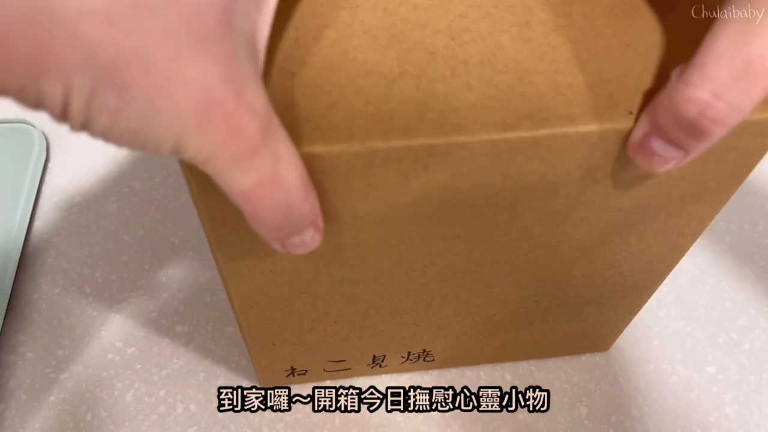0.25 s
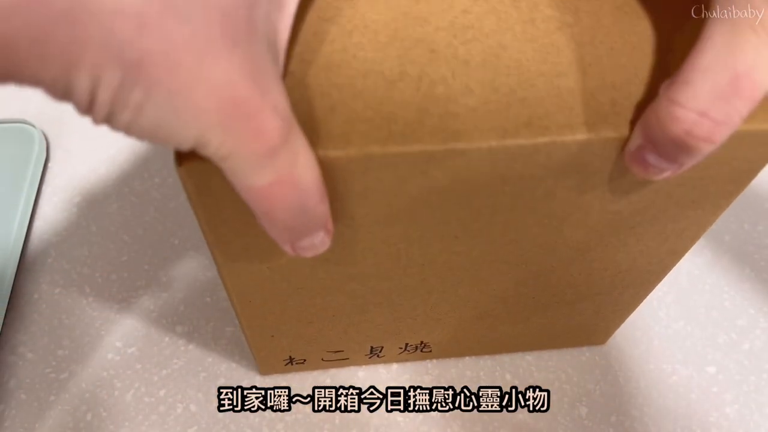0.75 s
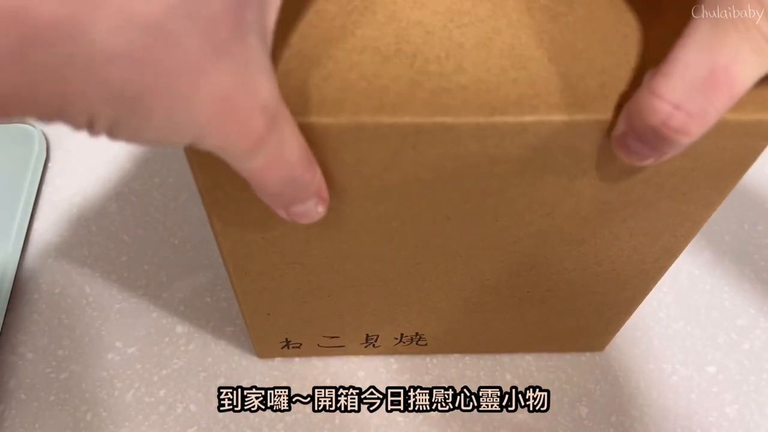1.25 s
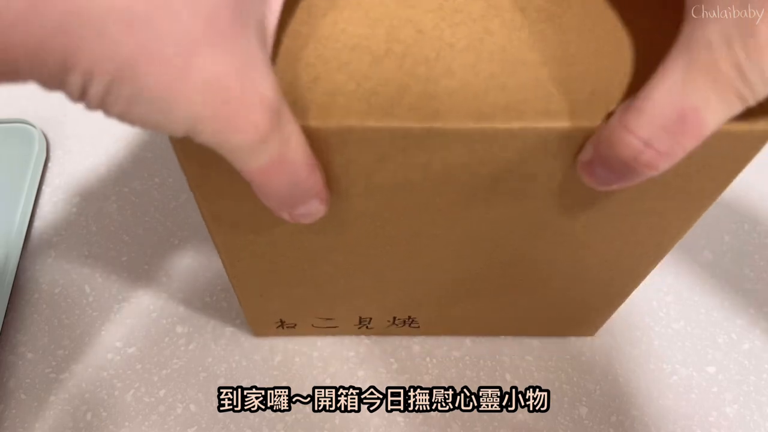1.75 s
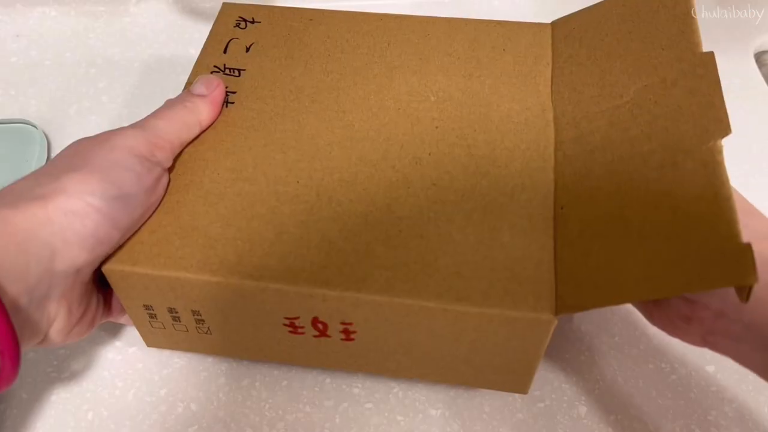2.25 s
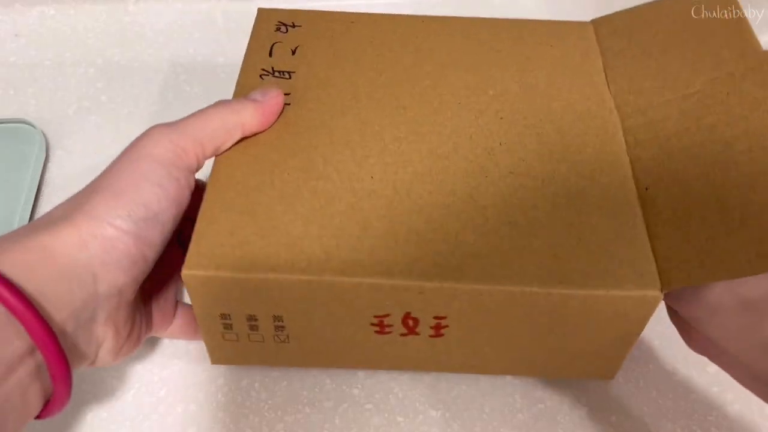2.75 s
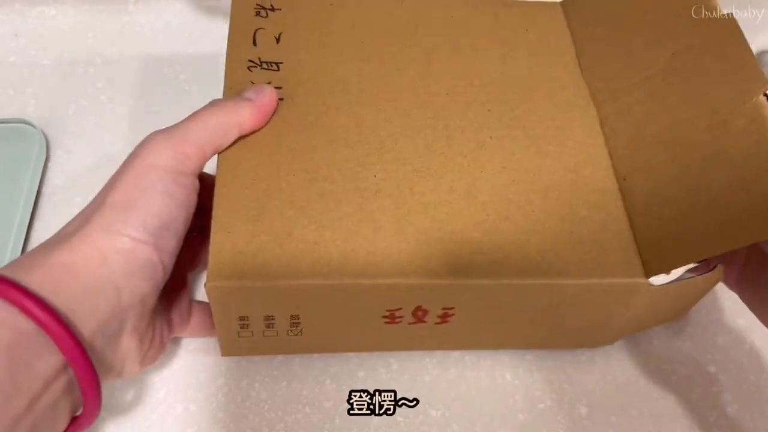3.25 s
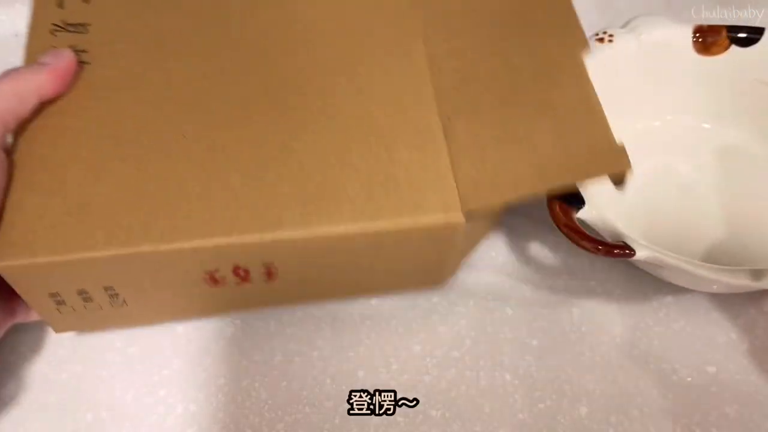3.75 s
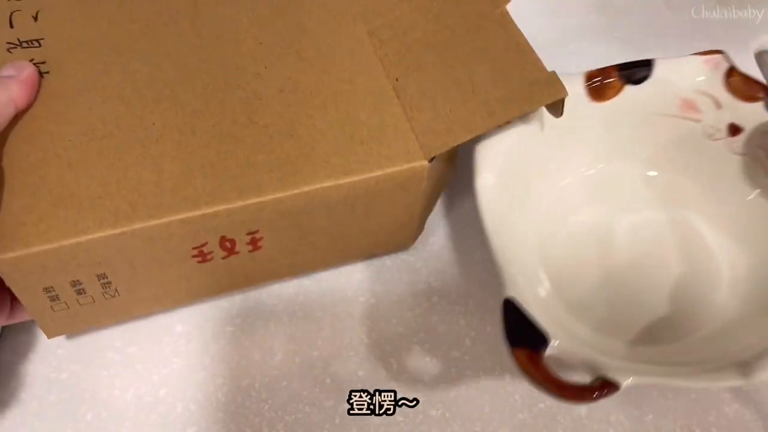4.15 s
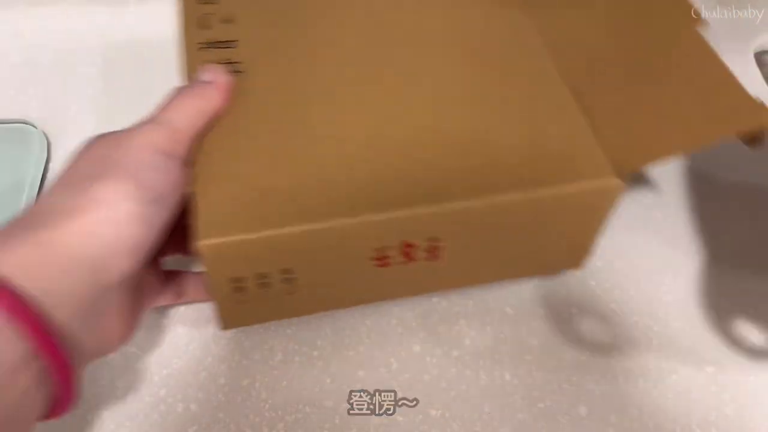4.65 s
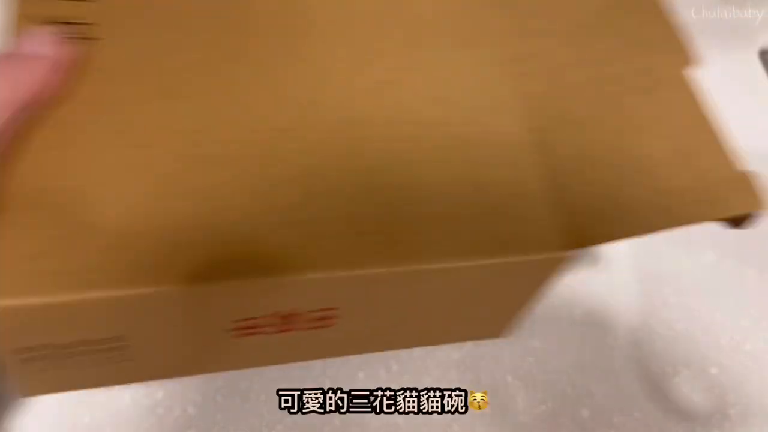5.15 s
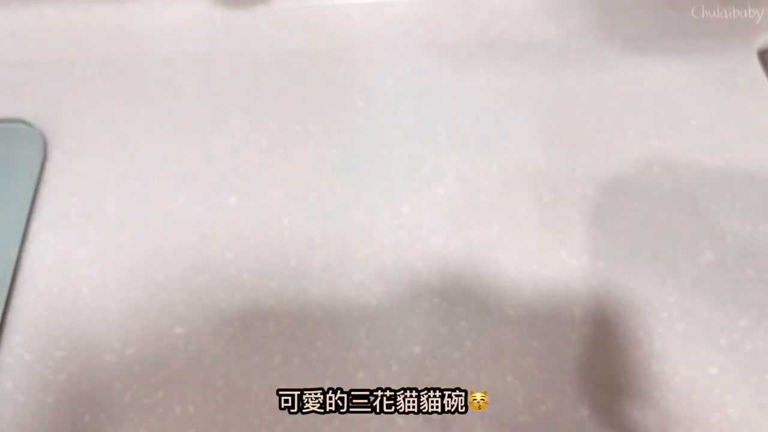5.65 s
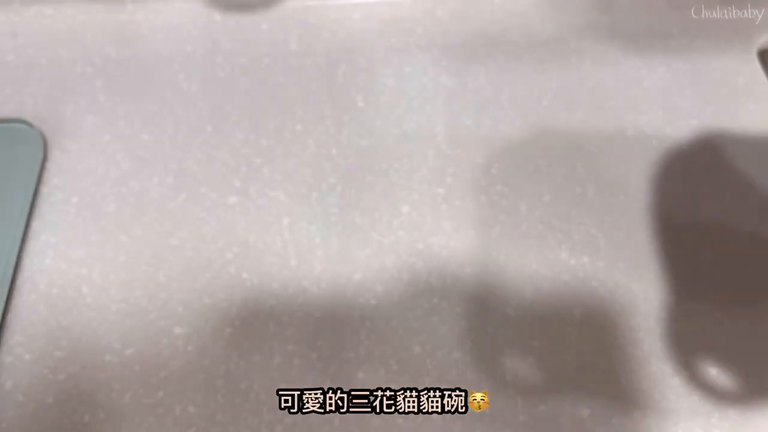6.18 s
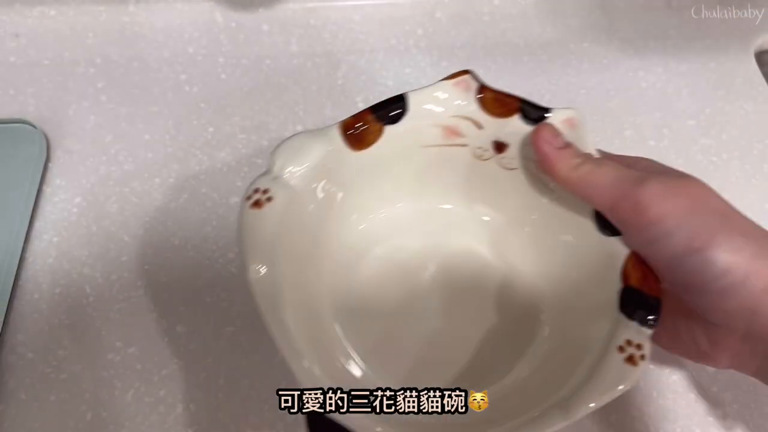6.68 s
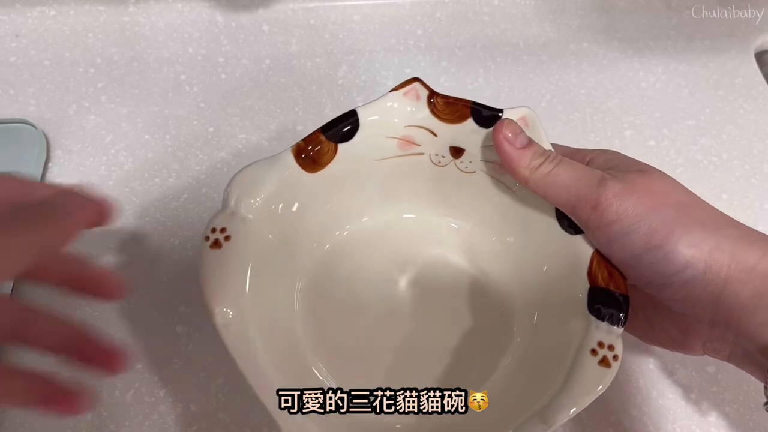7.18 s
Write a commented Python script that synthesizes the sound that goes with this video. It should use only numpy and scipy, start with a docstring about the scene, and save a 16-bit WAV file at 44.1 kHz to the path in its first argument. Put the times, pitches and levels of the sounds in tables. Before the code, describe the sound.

A cardboard box scrapes and snaps open in close hands, a ceramic bowl chatters out with small pings, then the box is pushed aside.

```python
"""Hands work a small cardboard box open, close by in a small room: stick-slip friction makes fingers and
flaps scrape, and noise bursts with a decaying sine make tabs snap. A ceramic bowl slides out, its taps
and pings summed from damped modes. Then the box is put down and pushed aside, with friction noise
in shifting resonances, and soft thumps ring the counter. Reflections and a faint low rumble add the room."""
import sys
import numpy as np
from scipy import signal
from scipy.fft import rfft, irfft
from scipy.io import wavfile

SR = 44100
rng = np.random.default_rng(int(sys.argv[2]) if len(sys.argv) > 2 else 0)


def put_to_file(sound):
    """Save the sound as 16-bit audio at rate SR, in the file named by the first command-line argument."""
    columns = np.atleast_2d(sound).T  # one column per channel
    safe = np.clip(columns, -1, 1)
    whole_steps = np.round(safe * 32767)
    wavfile.write(sys.argv[1], SR, whole_steps.astype(np.int16))


N = 327222
TIME = np.arange(N) / SR

# half-octave filter bank
EDGES = 36 * 2 ** (np.arange(19) / 2)
CENTRES = np.sqrt(EDGES[1:] * EDGES[:-1])
BANK = [signal.butter(2, pair, "band", fs=SR, output="sos") for pair in zip(EDGES, EDGES[1:])]

# centres of the zones of rumble, body and hiss (thump, body and crack in a knock): centre_hz
ZONE_CENTRES = [172, 735, 6140]


def from_db(db):
    """Decibel law: a level becomes an amplitude gain."""
    return 10 ** (np.asarray(db) / 20)


def rms_one(x):
    """Root mean square: scale a signal to effective value 1."""
    return x / np.sqrt(np.mean(x ** 2) + 1e-20)


def at_hz(points, hz):
    """Logarithmic pitch: interpolate a spectrum along log frequency."""
    points = np.array(points)
    return np.interp(np.log(hz), np.log(points[:, 0]), points[:, 1])


def zone_level(levels, hz):
    """Spectral interpolation: blend the low, middle and high level at one frequency."""
    shares = [np.interp(np.log(hz), np.log(ZONE_CENTRES), share) for share in np.eye(3)]
    return sum(level * share for level, share in zip(levels, shares))


def drift(rate):
    """Band-limited random wander: straight lines join rate random knots per second; spread 1."""
    knots = rng.standard_normal(N // 16)
    return rms_one(np.interp(TIME * rate, np.arange(len(knots)), knots))


def room_tone(apart_db):
    """Partly coherent noise: a faint low rumble, mostly alike on both sides."""
    # floor spectrum: centre_hz, level_db (per half octave)
    floor_spectrum = [(40, -84), (60, -68), (90, -74), (135, -68), (200, -80), (400, -83), (800, -88),
                      (1600, -92), (4000, -93), (8000, -95), (15000, -102)]
    shared = rng.standard_normal((2, 1, N))
    white = shared + from_db(apart_db) * rng.standard_normal((2, 2, N))
    out = np.zeros((2, N))
    for k, (hz, band) in enumerate(zip(CENTRES, BANK)):
        # neighbouring bands take separate noises
        out += from_db(at_hz(floor_spectrum, hz)) * rms_one(signal.sosfilt(band, white[k % 2]))
    return out


def room(x, early_db, early_t60_s, low_hz, alike_hz):
    """Reverberation by convolution: early reflections off counter and hands, then a dull tail."""
    tail_t60_s, tail_db, wall_cut_hz = 0.2, -11.5, 4200
    t = TIME[:SR // 2]
    dull = signal.butter(1, [low_hz, wall_cut_hz], "band", fs=SR, output="sos")
    highs = signal.butter(2, alike_hz, "high", fs=SR, output="sos")
    # both sides share the lows and hear their own highs
    alike = rng.standard_normal((2, 1, len(t)))
    apart = signal.sosfilt(highs, rng.standard_normal((2, 1, len(t))))
    echoes = signal.sosfilt(dull, alike + apart * [[1], [-1]])
    echoes *= t > .002
    early = from_db(early_db) * rms_one(echoes[0] * from_db(-60 * t / early_t60_s))
    tail = from_db(tail_db) * rms_one(echoes[1] * from_db(-60 * t / tail_t60_s))
    return signal.fftconvolve(x[None], (early + tail) / np.sqrt(len(t)), axes=1)[:, :N]


def resonance(x, hz, width_hz):
    """Damped oscillator: a two-pole filter with gain 1 on top."""
    r = np.exp(-np.pi * width_hz / SR)
    feed = np.array([1, 0, -1]) * (1 - r * r) / 2
    return signal.lfilter(feed, [1, -2 * r * np.cos(2 * np.pi * hz / SR), r * r], x + 1e-18)


def moving_resonance(x, hz, width_hz):
    """Heterodyne filtering: shift a gliding centre to zero, smooth, and shift back."""
    r = np.exp(-np.pi * width_hz / SR)
    turn = np.exp(2j * np.pi * np.cumsum(hz) / SR)
    return 2 * np.real(turn * signal.lfilter([1 - r], [1, -r], x / turn))


def through_box(x, modes):
    """Modal resonance: the direct sound plus the ringing of panels and cavity."""
    return x + sum(from_db(db) * resonance(x, hz, width_hz) for hz, width_hz, db in modes)


def damped_mode(t, hz, db, t60_s, top_hz):
    """Exponential decay: one sine fading 60 dB in t60_s, weaker above the brightness of the touch."""
    ring = from_db(db - 60 * t / t60_s) * np.sin(2 * np.pi * hz * t)
    return ring / np.hypot(1, (hz / top_hz) ** 2)


def struck(touches, modes, rise_s):
    """Modal synthesis: every touch sets all damped modes ringing."""
    out = np.zeros(N)
    for start_s, db, top_hz in touches:
        start = round(start_s * SR)
        t = TIME[:min(SR, N - start)]
        rings = sum(damped_mode(t, hz, db + mode_db, t60_s, top_hz) for hz, mode_db, t60_s in modes)
        out[start:start + len(t)] += rings * (1 - np.exp(-t / rise_s))
    return out


def stroke_levels(strokes):
    """Pressure envelope: each stroke swells, eases and loses contact; power of rumble, body and hiss."""
    swing_db = 16.5  # crest above the ends of a stroke
    lift_db_per_s = 452.5  # extra fade beyond the ends
    power = np.zeros((3, N))
    for crest_s, rise_s, fall_s, *levels_db in strokes:
        near = slice(max(0, int((crest_s - .5) * SR)), int((crest_s + .5) * SR))
        t = TIME[near] - crest_s
        pressure_db = -swing_db * np.maximum(-t / rise_s, t / fall_s)
        lift_db = -lift_db_per_s * np.maximum(0, np.maximum(-t - rise_s, t - fall_s))
        power[:, near] += np.outer(from_db(levels_db), from_db(pressure_db + lift_db)) ** 2
    return power


def friction(power, slips_per_s, grain_db, smooth_db, judder_db, judder_rate, patchy_db):
    """Stick-slip friction: fibres slip in uneven clicks on a smooth hiss, in clumps as the hand judders."""
    # colour of rubbing: centre_hz, level_db (per half octave)
    rub_colour = [(45, -19.5), (85, -5.5), (170, -6.5), (240, -11), (340, -9.5), (480, -4.5), (800, -15.5),
                  (1250, -6), (1900, -8), (2800, -6.5), (5500, -3), (9000, -6), (13500, -10.5),
                  (16000, -3.5)]
    levels = 10 * np.log10(power + 1e-12)
    sizes = from_db(grain_db * np.minimum(rng.exponential(1, N), 4))
    slips = rms_one(sizes * (rng.random(N) < slips_per_s / SR))
    judder = from_db(judder_db * drift(judder_rate))
    forces = []
    for _ in range(2):
        clicks = slips * rng.choice([-1, 1], N)
        hiss = from_db(smooth_db) * rng.standard_normal(N)
        forces.append(judder * (clicks + hiss))
    out = np.zeros(N)
    for k, (hz, band) in enumerate(zip(CENTRES, BANK)):
        level_db = zone_level(levels, hz) + at_hz(rub_colour, hz) + patchy_db * drift(25)
        out += rms_one(signal.sosfilt(band, forces[k % 2])) * from_db(level_db)
    return out


def counter_thumps():
    """Impact excitation: weight landing on the counter rings its low modes."""
    # landings: start_s, level_db, brightness_hz
    landings = [(6.076, -21.5, 203), (6.175, -30.5, 400), (6.64, -31, 251), (6.733, -32.5, 401)]
    # counter modes: pitch_hz, level_db, t60_s
    counter_modes = [(125.6, -0.5, 0.17), (208, -6.5, 0.05)]
    return struck(landings, counter_modes, rise_s=0.0098)


def pushed_box():
    """Moving resonances: the sliding box's modes shift as its weight moves from edge to edge."""
    # pushes over the counter: crest_s, rise_s, fall_s, rumble_db, body_db, hiss_db
    pushes = [(6.095, 0.04, 0.11, -74, -44.5, -47.5), (6.19, 0.051, 0.11, -55, -31, -39),
              (6.32, 0.17, 0.14, -43, -52, -57.5), (6.425, 0.22, 0.052, -56, -24, -57.5),
              (6.53, 0.18, 0.12, -41.5, -25, -52), (6.585, 0.069, 0.031, -46, -37, -53.5),
              (6.675, 0.02, 0.026, -51, -57, -49.5), (6.75, 0.057, 0.061, -41.5, -61.5, -87),
              (6.95, 0.046, 0.03, -58.5, -50.5, -110)]
    # modes of the box lying on the counter: pitch_hz, width_hz, level_db
    lying_modes = [(182.3, 40, 9.5), (475, 33, 7.5), (613, 24, 2), (847, 31, 13.5), (996, 40, 9),
                   (1340, 20, 2), (1774, 130, 3), (2384, 98, -1.5), (3130, 170, -5.5)]
    slide = friction(stroke_levels(pushes), slips_per_s=1600, grain_db=2.2, smooth_db=-3,
                     judder_db=1.3, judder_rate=130, patchy_db=3)
    out = from_db(1) * slide
    for hz, width_hz, db in lying_modes:
        shifting_hz = hz * 2 ** (.06 * drift(18))  # spread in octaves, knots per second
        out += from_db(db) * moving_resonance(slide, shifting_hz, width_hz)
    return out


def bowl_taps(spread_db, rise_s, tick_octaves):
    """Contact noise and modes: the bowl chatters along the wall; each tap ticks and rings the card."""
    # taps of glaze on card: start_s, ring_db, brightness_hz, tick_db
    tap_rows = [(4.005, -30.5, 2200, -40), (4.025, -30, 1800, -47.5), (4.036, -33, 1800, -36.5),
                (4.048, -31, 1800, -42), (4.065, -35, 1800, -46), (4.083, -31, 1980, -46),
                (4.098, -29.5, 2200, -45), (4.122, -29, 4000, -36.5), (4.147, -33, 2200, -45),
                (4.169, -36, 2200, -37.5), (4.175, -29.5, 3000, -29.5), (4.192, -30, 900, -72),
                (4.209, -30, 900, -64.5), (4.224, -42, 700, -74), (4.466, -41, 2900, -46),
                (4.486, -33, 687, -41), (4.507, -31, 720, -50), (4.534, -60, 1860, -57)]
    # modes of the box wall: pitch_hz, level_db, t60_s
    wall_modes = [(350, -8, .05), (452, 0, .075), (614, -5, .06), (750, -7, .05), (926, -2, .08),
                  (1130, -10, .04), (1250, -8, .045), (1390, -7, .045), (1830, -14, .03), (2500, -8, .022)]
    # bands of the tick: centre_hz, width_hz, level_db
    tick_bands = [(2000, 600, 10), (3300, 800, 8.5), (6800, 800, -1)]
    tick_life_s = .002
    t, out = TIME[:SR // 5], np.zeros(N)
    for start_s, db, top_hz, tick_db in tap_rows:
        rings = np.zeros(len(t))
        for k, (hz, mode_db, t60_s) in enumerate(wall_modes):
            # each mode takes its own strength; signs alternate
            ring_db = db + mode_db + spread_db * rng.standard_normal()
            rings += (-1) ** k * damped_mode(t, hz, ring_db, t60_s, top_hz)
        contact = rng.standard_normal(len(t)) * np.exp(-t / tick_life_s)
        tick = np.zeros(len(t))
        for hz, width_hz, band_db in tick_bands:
            # the colour varies with where the tap lands
            landed_hz = hz * 2 ** (tick_octaves * rng.standard_normal())
            tick += from_db(band_db) * resonance(contact, landed_hz, width_hz)
        start = round(start_s * SR)
        out[start:start + len(t)] += rings * (1 - np.exp(-t / rise_s)) + from_db(tick_db) * tick
    return out


def bowl_pings():
    """Free vibration: touches on the rim ring the bowl's modes, a softer touch being duller."""
    # rim touches: start_s, level_db, brightness_hz
    rim_touches = [(4.123, -56, 4000), (4.177, -35, 12000), (4.486, -47, 3000)]
    # bowl modes: pitch_hz, level_db, t60_s
    bowl_modes = [(3074, -8, .3), (3130, -24, .2), (3704, -26, .4), (4312, -35, .5), (5981, -22, .6),
                  (6051, -3, .21), (7962, -29, .45)]
    return struck(rim_touches, bowl_modes, rise_s=0.00034)


def squeaks():
    """Friction-driven resonance: card or glaze dragged under pressure sings in a rough, gliding band."""
    # squeaks: start_s, length_s, level_db, from_hz, to_hz, width_hz (of the narrower of two filters)
    squeak_rows = [(.135, 0.079, -48, 1000, 765, 200), (0.292, 0.041, -63, 2870, 3180, 200),
                   (1.02, 0.058, -48.5, 730, 960, 500), (0.587, 0.14, -50, 480, 426, 60),
                   (3.41, 0.076, -34.5, 436, 517, 50), (3.484, 0.05, -38, 1180, 1270, 90),
                   (3.519, 0.046, -42, 715, 736, 40), (4.272, 0.35, -74, 4870, 5170, 500),
                   (6.065, 0.019, -39, 1806, 1660, 400), (6.173, 0.072, -49, 1470, 2100, 250),
                   (6.267, 0.05, -58, 3860, 4030, 302), (6.496, 0.051, -35.5, 427, 480, 35),
                   (6.53, 0.057, -39, 873, 730, 80), (6.33, 0.17, -57.5, 1490, 1120, 695),
                   (6.556, 0.051, -51, 2000, 2450, 345), (6.564, 0.034, -55.5, 3200, 3080, 100)]
    out = np.zeros(N)
    for start_s, length_s, db, from_hz, to_hz, width_hz in squeak_rows:
        size, start = int(length_s * SR), round(start_s * SR)
        hz = np.linspace(from_hz, to_hz, size)
        sung = moving_resonance(rng.standard_normal(size), hz, width_hz)
        sung = moving_resonance(sung, hz, 2 * width_hz)
        out[start:start + size] += from_db(db) * rms_one(sung * np.sqrt(np.hanning(size)))
    return out


def gliding_flap():
    """Broad resonance: the flap glides along the box in one even, fine rustle of dense slips."""
    # glides: crest_s, rise_s, fall_s, rumble_db, body_db, hiss_db
    glides = [(2.41, 0.22, 0.18, -67, -52.5, -64.5), (2.55, 0.16, 0.17, -57, -43.5, -50),
              (2.82, 0.083, .3, -53, -40, -55), (3.02, 0.18, 0.076, -53.5, -32.5, -48.5)]
    # flap resonances: pitch_hz, width_hz, level_db
    flap_modes = [(680, 150, -4.5), (1250, 480, -3), (2600, 830, 1), (5673, 710, -8)]
    rustle = friction(stroke_levels(glides), slips_per_s=4000, grain_db=2, smooth_db=-2,
                      judder_db=.7, judder_rate=200, patchy_db=1.2)
    return through_box(rustle, flap_modes)


def grip_levels():
    """Steady rubbing: the grip creeps faintly, then fades as the box is lifted away; power per zone."""
    # creep in the three zones: rumble_db, body_db, hiss_db
    creep = [-63.5, -60.5, -78.5]
    end_s, fade_db_per_s = 4.57, 78
    fade = from_db(-fade_db_per_s * np.maximum(0, TIME - end_s))
    return np.outer(from_db(creep), fade) ** 2


def scrapes():
    """Stick-slip friction: fingers and flaps stroke the held box over the creep of the grip."""
    # strokes: crest_s, rise_s, fall_s, rumble_db, body_db, hiss_db
    strokes = [(.01, 0.16, 0.14, -56, -44, -57.5), (.18, 0.068, 0.086, -43.5, -32, -58.5),
               (.33, 0.067, 0.22, -59, -46.5, -59), (.53, 0.043, 0.05, -63, -37, -58),
               (.67, 0.2, 0.28, -47, -38.5, -59.5), (.98, 0.023, 0.18, -45.5, -37, -66.5),
               (1.06, 0.041, 0.16, -43.5, -36, -52), (1.29, 0.098, 0.082, -52, -47, -57),
               (1.42, 0.12, 0.045, -48, -38.5, -55), (1.55, 0.019, 0.055, -52, -51, -85),
               (1.59, 0.014, 0.024, -55, -40.5, -49), (1.74, 0.081, 0.12, -55, -42, -52.5),
               (1.89, 0.32, 0.16, -54.5, -45.5, -56), (1.965, 0.019, 0.037, -57.5, -38.5, -43.5),
               (2.09, 0.15, 0.36, -54, -42, -59), (3.07, 0.053, 0.046, -42.5, -18.5, -31.5),
               (3.18, 0.22, 0.21, -48, -54.5, -57), (3.34, 0.034, 0.079, -54, -49.5, -64),
               (3.445, 0.045, 0.058, -54.5, -22.5, -37.5), (3.54, 0.1, 0.11, -38.5, -33.5, -57),
               (3.9, .03, 0.073, -49.5, -55, -61), (4.03, 0.024, 0.11, -50, -33, -54),
               (4.21, 0.15, 0.1, -49, -44, -55), (4.295, 0.033, 0.079, -40, -51, -64.5),
               (4.49, 0.035, 0.059, -43.5, -32.5, -74), (4.745, 0.043, 0.12, -56.5, -61, -61),
               (4.965, 0.053, 0.09, -74.5, -67.5, -78)]
    return friction(stroke_levels(strokes) + grip_levels(), slips_per_s=900, grain_db=2.1, smooth_db=-1,
                    judder_db=1.7, judder_rate=130, patchy_db=1.9)


def knocks(rows, panel_db, bass_lag, rise_share):
    """Impact: a burst of crushed fibres, longer in the bass, plus the brief swing of the struck panel."""
    # colour of knocks: centre_hz, level_db (per half octave)
    blow_colour = [(45, -33), (90, -20.5), (170, -5.5), (240, -7.5), (340, -15), (480, -1), (800, -15.5),
                   (1250, -7), (1900, -5.5), (2800, -8), (5500, -9.5), (9000, -9.5), (13500, -16),
                   (16000, -17.5)]
    size = SR // 8
    t, out = TIME[:size], np.zeros(N + size)
    # a burst holds the energy of 10 ms at its level
    fill = np.sqrt(SR / 100 / size)
    for start_s, thump_db, body_db, crack_db, pitch_hz, contact_ms, panel_t60_s in rows:
        white = rng.standard_normal((len(BANK), size))
        contact_s = contact_ms / 1000
        attack = 1 - np.exp(-t / (rise_share * contact_s))
        swing = np.sin(2 * np.pi * pitch_hz * t) * from_db(-60 * t / panel_t60_s) * attack
        blow = from_db(body_db + panel_db) * rms_one(swing)
        for hz, band, noise in zip(CENTRES, BANK, white):
            life_s = contact_s * (ZONE_CENTRES[1] / hz) ** bass_lag
            crushed = noise * attack * np.exp(-t / life_s)
            burst = rms_one(signal.sosfilt(band, crushed + 1e-18))
            level_db = zone_level([thump_db, body_db, crack_db], hz) + at_hz(blow_colour, hz)
            blow = blow + burst * from_db(level_db)
        start = round(start_s * SR)
        out[start:start + size] += fill * blow
    return out[:N]


def box_jolts():
    """Low-frequency modes: the hands jolt the whole box and it sways."""
    # jolts: start_s, level_db, brightness_hz
    jolt_rows = [(.968, -29.5, 170), (1.02, -35, 70), (1.078, -32, 100), (1.135, -38, 130),
                 (1.7, -41.5, 200), (1.765, -40, 120), (1.865, -42, 120), (2.012, -36, 396.7),
                 (2.052, -29.5, 80), (4.362, -38.5, 200)]
    # swaying modes: pitch_hz, level_db, t60_s
    sway_modes = [(58.3, -5.5, .2), (78, 2, 0.13), (118, -6, 0.18)]
    return struck(jolt_rows, sway_modes, rise_s=0.0048)


def handled_box():
    """Source and resonator: scrapes and knocks excite the box; while shut and stiff it rings on."""
    # snaps and knocks: start_s, thump_db, body_db, crack_db, pitch_hz (panel), contact_ms, t60_s (panel);
    # the three levels are relative, before colour and box
    knock_rows = [(0.339, -74, -43.5, -74, 413, 2.3, 0.081), (.418, -56, -42.5, -53, 1430, 1.1, 0.027),
                  (0.538, -85, -79, -41, 457, 13, .04), (.572, -71.5, -48.5, -37, 437, 7.6, 0.052),
                  (0.607, -58, -39.5, -77, 408, 6.2, 0.038), (.705, -80, -39.5, -63, 465, 2.7, 0.023),
                  (0.753, -74, -43.5, -53, 485, 1.1, 0.034), (.777, -66, -42.5, -52.5, 870, 7.3, 0.025),
                  (0.863, -76, -43.5, -60.5, 404, 4.9, .05), (1.1182, -37, -25.5, -29.5, 1160, 2.6, 0.008),
                  (1.287, -57, -40, -40.5, 2690, 3.2, 0.034), (1.303, -69, -44.5, -58, 448, 3.9, 0.12),
                  (1.693, -57, -38.5, -54, 740, 3.2, 0.038), (1.745, -38, -38, -50, 615, 0.9, 0.027),
                  (1.762, -63, -34.5, -41, 2900, 6.7, 0.019), (1.833, -40, -25.5, -35.5, 963, 8.1, 0.039),
                  (1.902, -41, -25.5, -35.5, 540, 2.5, 0.04), (2.0055, -51, -17.5, -28.5, 560, 1.7, 0.03),
                  (2.0135, -34, -27, -29.5, 620, 4.3, 0.04), (2.154, -59, -37.5, -50, 635, 1.7, 0.013),
                  (3.039, -23, -33, -33, 426, 5.3, 0.1), (3.069, -20.5, -26.5, -59, 438, 8.7, 0.11),
                  (3.455, -49.5, -14, -46, 1174, 2.2, 0.038), (3.4625, -39, -20, -83.5, 660, 3, 0.02),
                  (3.52, -48.5, -22, -41.5, 1260, 3.6, 0.026), (3.595, -63.5, -43.5, -64.5, 712, 1.8, 0.04),
                  (3.652, -39, -30.5, -48.5, 476, 8.2, 0.032), (3.658, -37.5, -28, -71.5, 718, 0.69, 0.084),
                  (3.818, -33, -24.5, -57.5, 644, 6.1, 0.057), (3.843, -34, -32.5, -63, 702, 11, .07),
                  (3.862, -54.5, -56.5, -31, 620, 4.6, 0.05), (4.262, -36, -34.5, -53, 450, 9.4, 0.074),
                  (4.286, -33.5, -31.5, -70, 916, 2.2, 0.05), (4.714, -42.5, -40.5, -62, 448, 3.6, 0.055),
                  (6.070, -92, -30, -47, 604, 11, 0.062), (6.202, -79, -28.5, -77, 990, 2, 0.098),
                  (6.567, -64, -44, -56, 2380, 6, .04), (6.67, -78.5, -38, -93, 464, 4.3, 0.053),
                  (6.732, -33.5, -52, -99, 198, 6.2, 0.038), (6.915, -63, -62, -104, 800, 5.6, 0.04),
                  (7.297, -58, -71, -102, 699, 5.3, .04), (7.359, -63.5, -72, -101, 775, 4.6, 0.035)]
    # modes of the box held in the hands: pitch_hz, width_hz, level_db
    held_modes = [(201, 9.3, -10.5), (462, 28, 0.5), (654, 29, -5), (710, 65, -2), (938.5, 26, 1),
                  (1273, 30, -1.5), (1824, 58, 1), (2494, 300, -4), (3170, 170, -7.5)]
    # modes of the shut box: pitch_hz, level_db, t60_s
    shut_modes = [(447, -4.5, .16), (791, -24, .25), (915, -18, .19), (1222, -21, .22), (1690, -23, .18)]
    open_s, ring_top_hz = 2.1, 4000
    blows = knocks(knock_rows, panel_db=-5.0, bass_lag=0.027, rise_share=0.06)
    excitation = from_db(-2.5) * scrapes() + from_db(-1.2) * blows
    shut_touches = [(row[0], row[2], ring_top_hz) for row in knock_rows if row[0] < open_s]
    after_ring = struck(shut_touches, shut_modes, rise_s=0.0011)
    return through_box(excitation, held_modes) + after_ring + box_jolts()


def scene():
    """Superposition: box, bowl and counter add up, with their reflections and the room tone."""
    floor = room_tone(apart_db=-4)
    bowl = bowl_taps(spread_db=3.5, rise_s=0.0017, tick_octaves=0.25) + bowl_pings()
    counter = counter_thumps() + from_db(-11) * pushed_box()
    near = handled_box() + gliding_flap() + squeaks() + bowl + counter
    heard = near + room(near, early_db=-14, early_t60_s=0.043, low_hz=290, alike_hz=330)
    return heard + floor


def record(dry):
    """Interaural-style cues: two microphone ports differ in level and phase; deep bass and top are cut."""
    # lead of the left port over the right: frequency_hz, level_db
    port_balance = [(100, 2.2), (400, 2.3), (700, 5), (1500, 0.5), (5500, 6), (10000, -1.1)]
    # phase by which the right port trails the left: frequency_hz, lag_rad
    port_lag = [(50, 0), (780, .25), (1350, 0), (1810, 2.1), (2070, 6.1), (3270, 6.9), (5860, 6.6),
                (8270, 4.8), (9300, 3.4), (10700, 3.0), (11600, 1.9), (13000, 0)]
    hz = np.maximum(np.fft.rfftfreq(2 * N, 1 / SR), 1)
    lean = from_db(at_hz(port_balance, hz) / 2)  # half the lead on each side
    trail = np.exp(-1j * at_hz(port_lag, hz))
    ports = irfft(rfft(dry, 2 * N) * np.array([lean, trail / lean]))[:, :N]
    ports = signal.sosfilt(signal.butter(2, 38, "high", fs=SR, output="sos"), ports)
    return signal.sosfilt(signal.ellip(10, .2, 80, 16200, fs=SR, output="sos"), ports)


dry = scene()
out = record(dry)
put_to_file(out)
```